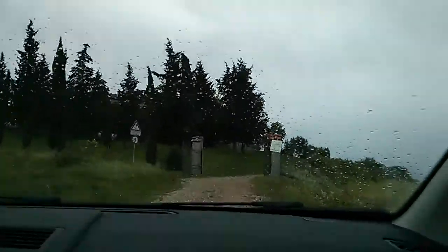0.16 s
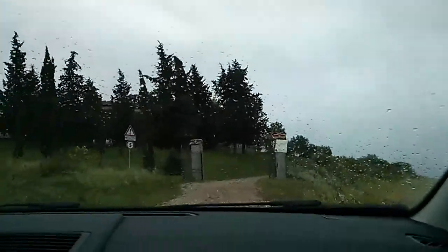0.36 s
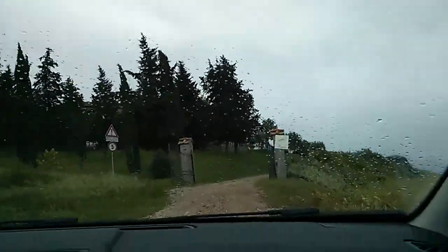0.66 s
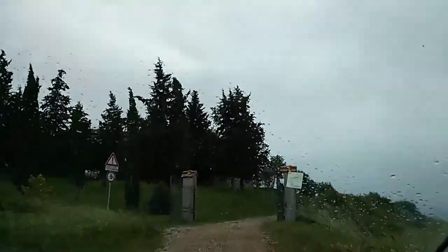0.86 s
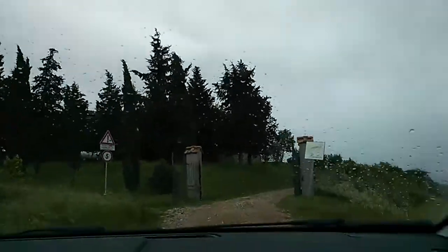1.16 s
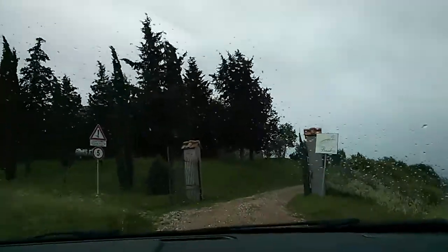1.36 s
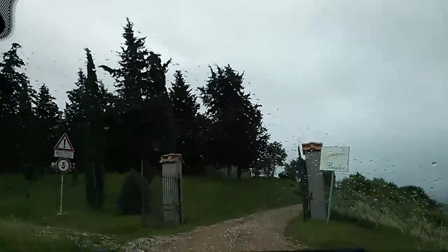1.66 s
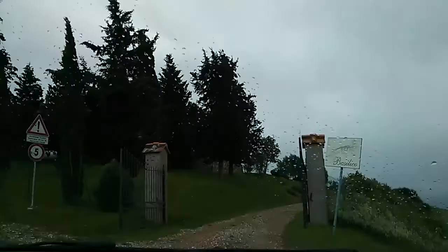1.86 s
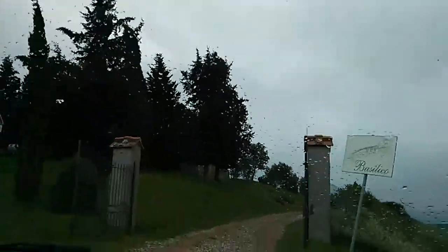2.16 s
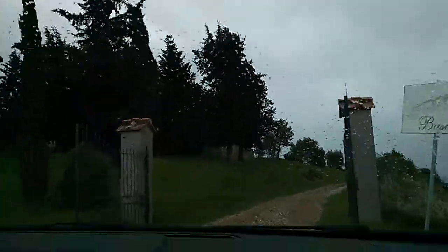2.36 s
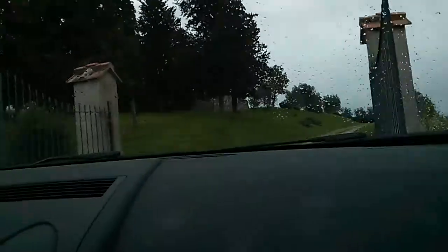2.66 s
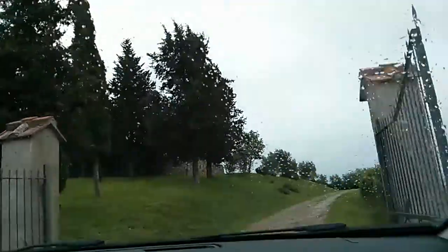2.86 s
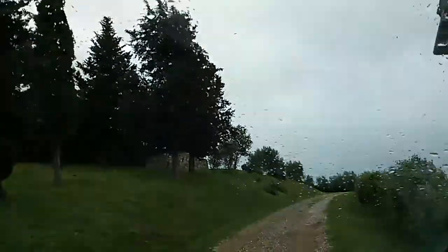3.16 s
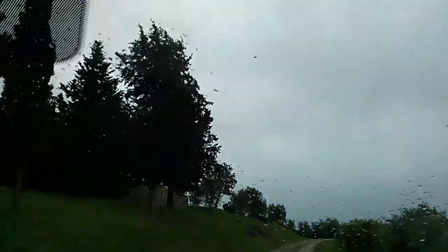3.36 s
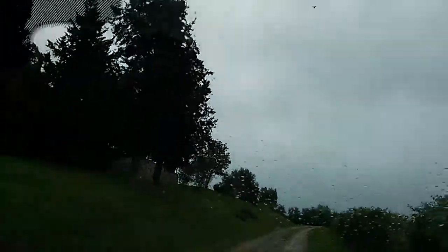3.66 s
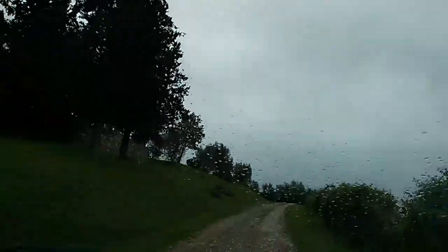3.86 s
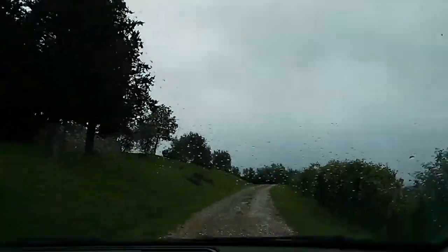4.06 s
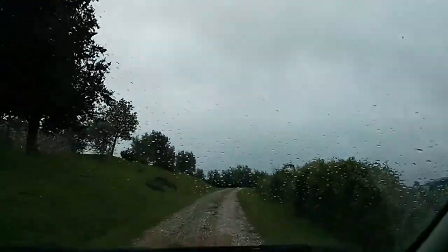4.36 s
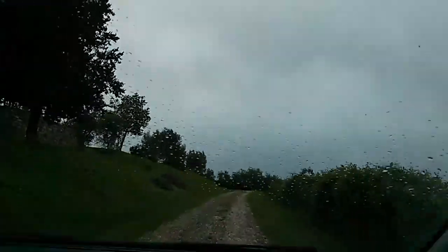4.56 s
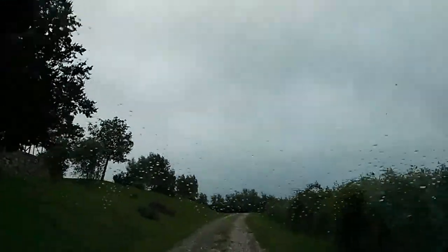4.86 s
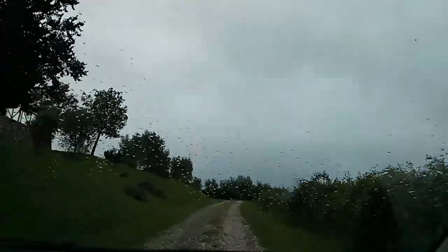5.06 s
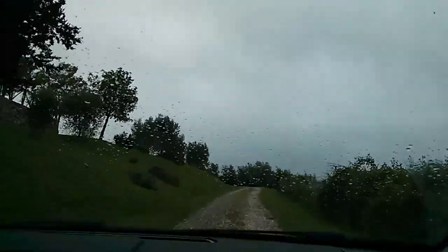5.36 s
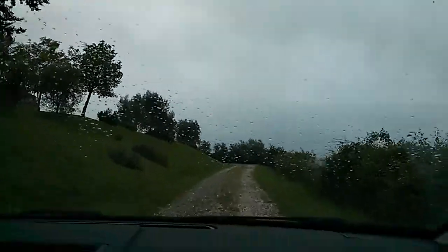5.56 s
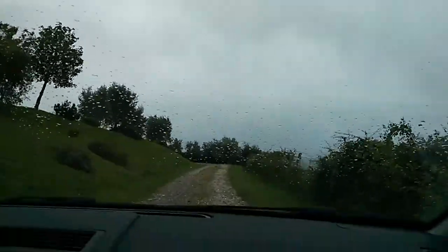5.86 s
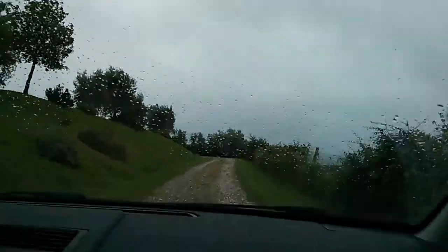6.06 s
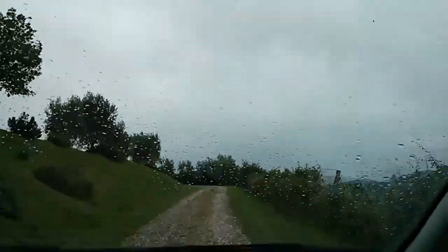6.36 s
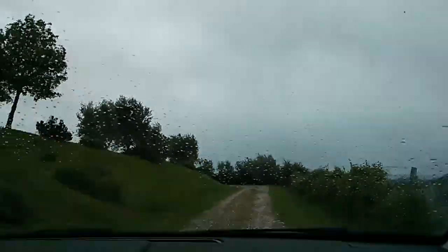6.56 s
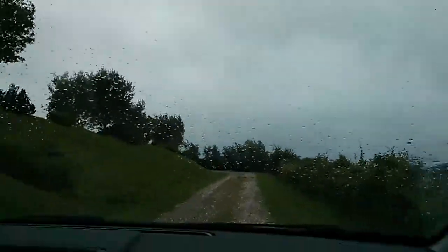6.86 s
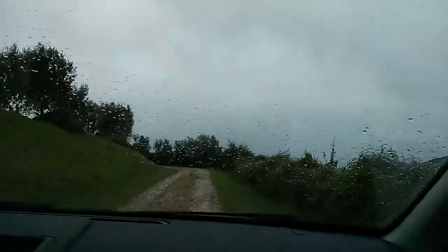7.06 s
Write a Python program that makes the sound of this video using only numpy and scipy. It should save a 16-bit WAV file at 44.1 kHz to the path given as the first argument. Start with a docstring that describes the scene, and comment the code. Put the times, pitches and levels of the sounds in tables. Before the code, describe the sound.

From the passenger seat of a car crawling up a rough track, the closed cabin holds a soft low engine hum and muffled tyre rumble. From 0 to 2.4 s it is subdued: gentle gravel crunch, fine grit, small trim knocks, light key clinks and low bumps near 1.3 and 1.6 s. Around 2.5 to 2.9 s firmer bumps come with a few stones below; plastic ticks and bright key jingles follow, strongest near 3.6 and 4.2 s. At about 4.7 s the ground turns violent: booming jolts, dull suspension clunks, rapid stone thuds and cracks, rattling fittings and a faint whine. The overloaded microphone blocks in short stutters, densest at 4.9-5.06 s and 6.2-6.4 s. A slight easing around 5.4 s precedes more knocks and heavy bumps near 6.4 s. Grit hisses louder near 6.6 s; leaves swish briefly along the door at 7.0-7.15 s, still moving at the end.

```python
"""Stones drum and gravel crunches under a car crawling along a rough track, heard from the passenger seat.
Filtered impacts and noise make the ground and a bush brushing the door; summed sines make engine and boom.
Decaying sines and chatter ring suspension, trim, a bunch of keys and stones on the underbody.
On the roughest stretch the small microphone in the cabin is overloaded and blocks in short stutters."""
import sys
import numpy as np
from scipy import signal
from scipy.fft import rfft, irfft, next_fast_len
from scipy.io import wavfile
from scipy.ndimage import uniform_filter1d

SR = 44100
rng = np.random.default_rng(int(sys.argv[2]) if len(sys.argv) > 2 else 0)


def generate_wav(sig):
    """Save sig (samples, or channels by samples) to the path in sys.argv[1] as 16-bit PCM at SR."""
    pcm = np.round(np.clip(np.atleast_2d(sig).T, -1, 1) * 32767).astype(np.int16)
    wavfile.write(sys.argv[1], SR, pcm)


N = 318843
TIME = np.arange(N) / SR  # seconds

# Levels are relative, ahead of the microphone; a source may add its own gain.
# Engine under the bonnet. Each row: time in seconds, firing rate in Hz before its wander, level in dB.
ENGINE = [(0, 53, -30), (1.2, 51.54, -37.5), (2.3, 50.08, -40.5), (4.1, 51.28, -34), (4.9, 54.46, -33),
          (5.6, 53.07, -28), (6.3, 52.28, -30), (7.23, 52.76, -22.5)]
# Its harmonics. Each row: multiple of the firing rate, level in dB.
ENGINE_ORDERS = [(1, -23), (2, -0.5), (3, -9.5), (4, -12), (5, -11)]
# Gearbox whine, faint. Each row: time in seconds, pitch in Hz, level in dB.
WHINE = [(0, 663, -54), (0.9, 657, -54.5), (1.3, 665, -53.5), (2.0, 660, -58), (3.2, 660, -58),
         (3.8, 682, -54.5), (4.4, 672, -56), (4.9, 740, -47), (5.3, 760, -42), (5.6, 765, -48),
         (6.7, 778, -42), (7.23, 783, -43)]

# A bush sweeps along the door. Each row: time in seconds, level in dB.
BRUSH = [(6.9, -94), (6.99, -39.5), (7.05, -35.5), (7.09, -31.5), (7.14, -39), (7.18, -69), (7.23, -67)]
# Colour of its leaves on the paintwork. Each row: frequency in Hz, level in dB.
BRUSH_COLOUR = [(700, -20), (1400, -1), (2200, -7), (3000, -16.5), (4000, -14), (6000, -6), (8500, 0.5),
                (11000, -5.5), (13500, -14), (16000, -30)]

# A small hard part ticks. Each row: start in seconds, level in dB.
TICKS = [(0.052, -41), (0.147, -41), (0.454, -42), (1.393, -46), (1.653, -59), (1.837, -49), (1.933, -46),
         (2.691, -29.5), (2.998, -29.5), (3.25, -41), (3.306, -27.5), (3.48, -41), (3.574, -30.5),
         (3.689, -40), (3.702, -39), (3.727, -42), (3.752, -37.5), (3.911, -47), (4.209, -34), (4.438, -41)]
# What it rings with. Each row: frequency in Hz, width in Hz, level in dB.
TICK_MODES = [(3100, 93, -11), (4140, 140, -6), (4560, 640, 7), (5200, 280, 1), (5830, 490, -1)]
# A looser fitting rattles. Each row: start in seconds, level in dB.
RATTLES = [(2.84, -42), (2.907, -37), (3.32, -33), (4.955, -22), (4.983, -14), (5.082, -21.5), (5.196, -25),
           (5.206, -20.5), (5.317, -37), (5.633, -43), (5.668, -43), (6.312, -32), (6.349, -44),
           (6.39, -45), (6.613, -29), (6.625, -30), (6.67, -28), (6.68, -48), (6.733, -30), (6.743, -41),
           (6.751, -20), (6.775, -51), (6.792, -32), (6.812, -31), (6.826, -56)]
# What it rings with. Each row: frequency in Hz, width in Hz, level in dB.
RATTLE_MODES = [(2670, 73, -16), (3300, 98, -3), (3670, 100, 9), (4160, 540, 7), (5100, 130, -20)]
# A hard plastic part clacks. Each row: start in seconds, level in dB.
CLACKS = [(1.025, -35)]
# What it rings with. Each row: frequency in Hz, width in Hz, level in dB.
CLACK_MODES = [(824, 60, 2), (1450, 90, -1), (1740, 100, 0), (1950, 170, 0), (2780, 300, -10.5),
               (4010, 200, -15), (5400, 260, -7), (6100, 270, -14), (7300, 200, -20)]

# Loose trim knocks. Each row: start in seconds, level in dB, centre in Hz.
KNOCKS = [(0.056, -33, 1540), (0.25, -28, 1130), (0.275, -43, 1710), (0.662, -42, 1060), (1.231, -39, 900),
          (1.3, -46, 1410), (1.377, -27, 760), (1.391, -45, 1900), (1.574, -35, 1050), (1.635, -33, 990),
          (1.837, -35, 1560), (2.26, -41, 1000), (2.611, -28.5, 1650), (2.8, -48, 990), (2.9, -29.5, 1900),
          (3.188, -37.5, 1470), (3.775, -34, 1600), (4.06, -36, 1050), (4.597, -25.5, 1550),
          (4.67, -34, 860), (4.776, -14, 1060), (5.575, -15, 1110), (5.836, -21.5, 1020),
          (6.047, -34, 2100), (6.183, -39, 1950), (6.393, -16.5, 1000), (6.466, -29, 915),
          (6.992, -31, 1140), (7.151, -21, 1500)]
# Ring time of a middling knock at 1 kHz; higher parts die away sooner by this power.
KNOCK_T60_S, KNOCK_DAMPING = 0.064, 0.58
# A harder knock presses the part home: its chatter halves every so many dB.
MIDDLING_KNOCK_DB, KNOCK_HALVING_DB = -17, 8.5

# Keys on their ring. Each row: frequency in Hz, level in dB, ring time (t60) in seconds.
KEY_MODES = [(7650, -2, .12), (8380, -4, .025), (8890, -1, .035), (9430, -2, .035), (9760, -2, .025),
             (10250, -4, .03), (10700, -4, .025), (11820, -6, .035), (12035, -2, .06), (12085, -3, .06),
             (12160, -4, .05), (12810, -6, .04), (13820, -3, .05), (14950, -5, .03), (15550, -5, .03)]
# Keys touch. Each row: start in seconds, ring level in dB, frequency rung hardest in Hz, scrape level in dB.
CLINKS = [(0.126, -48, 8700, -29), (0.471, -25, 7600, -13.5), (.539, -25, 12100, -24),
          (0.644, -43, 15500, -28.5), (1.886, -33, 8300, -17.5), (2.128, -20.5, 12040, -22),
          (2.155, -19, 13200, -20.5), (2.315, -43, 13800, -31), (2.488, -20.5, 10100, -25),
          (2.509, -33, 13800, -22), (2.653, -35, 7820, -22.5), (3, -27, 7650, -16.5),
          (3.036, -37, 13800, -23.5), (3.072, -32, 8400, -27), (3.089, -20, 9800, -25),
          (3.108, -14, 13300, -21), (3.336, -33, 9000, -20.5), (3.357, -35, 12100, -26),
          (3.412, -44, 12100, -32), (3.569, -17.5, 9700, -23), (3.617, -7.5, 12750, -14.5),
          (3.638, -13, 12000, -20.5), (3.76, -24.5, 9800, -29), (4.181, -12.5, 8900, -18.5),
          (4.275, -27, 13200, -26), (4.437, -29, 8250, -23.5), (4.495, -46, 8480, -23),
          (4.634, -26, 13100, -24.5), (4.681, -27, 14970, -24.5), (5.001, -19, 8460, -28),
          (5.026, -15, 11600, -28), (5.043, -9, 10300, -31), (5.27, -21, 8300, -30),
          (5.353, -40, 8200, -32), (5.482, -26.5, 9200, -21), (5.564, -22, 14600, -23),
          (5.87, -40, 8890, -21), (6.016, -27, 13900, -23.5), (6.084, -16, 9700, -21),
          (6.554, -17.5, 8160, -22), (6.641, -25, 9700, -24)]
# Light chance touches: their rate, and ring and scrape in dB above the capped grit level.
TOUCHES_PER_S, TOUCH_RING_DB, TOUCH_SCRAPE_DB = 4, 13, 21

# Suspension clunks over a big stone. Each row: start in seconds, level in dB, pitch in Hz.
CLUNKS = [(0.251, -26, 625), (0.585, -28, 342), (1.3, -29, 387), (1.548, -29, 391), (1.652, -23, 354),
          (1.715, -28, 350), (2.494, -26.5, 565), (2.616, -28, 760), (2.879, -37, 393), (3.283, -32, 355),
          (3.452, -27.5, 384), (4.775, -19.5, 824), (4.853, -16.5, 474), (5.056, -12, 475),
          (5.152, -15, 525), (5.212, -19, 420), (5.271, -12.5, 794), (5.297, -29, 335), (5.353, -17, 802),
          (5.491, -17.5, 598), (5.599, -18, 340), (5.665, -14.5, 321), (5.752, -14, 360),
          (5.787, -23.5, 500), (5.826, -17.5, 400), (5.838, -26.5, 710), (5.862, -26, 460),
          (6.004, -27, 686), (6.139, -20, 335), (6.252, -24.5, 436), (6.27, -21.5, 646), (6.379, -27, 420),
          (6.427, -19, 360), (6.467, -21, 387), (6.511, -25, 327), (6.682, -15, 413), (6.768, -17, 534),
          (6.99, -19, 760)]
# What it rings with. Each row: multiple of the pitch, level in dB.
CLUNK_MODES = [(.76, -4), (1, 4), (1.24, -4.5), (1.9, -17)]
CLUNK_T60_S, CLUNK_ATTACK_S, CLUNK_DB = 0.068, 0.0036, -0.5
REBOUND_S, REBOUND_DB = .016, -7.5  # mean delay of the second, softer blow

# A wheel drops into a rut. Each row: start in seconds, level in dB, boom in Hz.
BUMPS = [(0.05, -13.5, 165), (1.292, -14, 163), (1.591, -15.5, 208), (1.652, -16, 174), (1.883, -19, 128),
         (2.48, -11, 138), (2.552, -16, 185), (2.874, -8.5, 148), (3.969, -9.5, 179), (4.598, -14, 176),
         (4.648, -15, 177), (4.774, -7, 189), (4.852, -3.5, 186), (5.057, -1.5, 172), (5.168, 3, 125),
         (5.293, -1, 158), (5.501, -21, 169), (5.752, -7, 186), (6.428, 1.5, 119), (6.465, -0.5, 194),
         (6.873, -2, 112), (6.895, -7, 123)]
# The floor booms on washboard ground. Each row: start in seconds, length in seconds, pitch in Hz, level in dB.
WASHBOARD = [(0.01, 0.31, 168.4, -30), (0.451, 0.15, 113, -27), (0.912, 0.11, 105.3, -30),
             (1.296, 0.069, 166, -31), (4.031, 0.096, 160.1, -26), (4.585, 0.14, 176, -18.5),
             (4.761, 0.19, 190, -19.5), (5.474, 0.11, 179, -16.5), (6.365, 0.29, 185, -23.5),
             (6.704, 0.62, 181.5, -30.5)]

# Stones hit the underbody. Each row: start in seconds, thud level in dB, crack level in dB.
STRIKES = [(2.4914, -42, -58), (2.5294, -32.5, -44), (2.8784, -39, -57), (2.9058, -37, -51),
           (4.738, -23, -52), (4.774, -27, -38), (4.8214, -22, -33), (4.844, -19.5, -35),
           (4.8554, -19.5, -33), (4.8661, -27, -36), (4.8759, -13.5, -31), (4.8907, -18, -34),
           (4.91, -21, -35), (4.95, -20, -35), (4.968, -13.5, -30), (4.981, -19, -28), (5.001, -22, -31),
           (5.0267, -20.5, -31), (5.045, -20, -29), (5.0594, -37, -29), (5.0794, -36, -45),
           (5.104, -40, -33), (5.1574, -29.5, -35.5), (5.1752, -22, -33), (5.2048, -23, -33.5),
           (5.245, -27, -35), (5.2703, -20, -28), (5.3396, -29.5, -33), (5.3536, -24, -29.5),
           (5.49, -24, -53), (5.576, -29.5, -59), (5.6301, -22, -41), (5.6667, -25, -39), (5.695, -30, -48),
           (5.757, -34, -54), (5.834, -32, -55), (6.271, -36, -49), (6.3128, -28, -50),
           (6.3491, -26, -42.5), (6.394, -32, -52), (6.4383, -23.5, -53), (6.4504, -46, -49),
           (6.4668, -30, -50), (6.6117, -29.5, -34.5), (6.663, -26, -47), (6.7321, -38, -43),
           (6.7894, -30.5, -41), (6.9895, -23, -47)]
# Thud of the floor pan. Each row: frequency in Hz, width in Hz, level in dB.
THUD_MODES = [(425, 110, 9), (760, 230, 6), (996, 235, -5.5), (1206, 94, -3.5), (1604, 190, -7),
              (1900, 100, -1), (2230, 64, -4.5)]
# Crack of the stone itself. Each row: frequency in Hz, width in Hz, level in dB.
STONE_MODES = [(2970, 250, -6), (3960, 650, -1.6), (5400, 250, -0.5), (7150, 1900, 5.5)]

# Trend of the ground. Each row: time in seconds, body sway in dB, wheel rumble in dB, crunch in dB.
RIDE = [(0.0, -29, -27, -36), (0.14, -29.5, -30.5, -41.5), (0.7, -35.5, -34.5, -47),
        (1.53, -31.5, -31.5, -45.5), (2.15, -35.5, -34, -45.5), (2.64, -33.5, -33.5, -46.5),
        (3.58, -37.5, -33, -46.5), (4.09, -34, -33.5, -40.5), (4.61, -37.5, -29, -41),
        (4.83, -42, -20, -29), (5.07, -18, -24, -29), (5.48, -34, -21.5, -34), (6.04, -26.5, -25.5, -35.5),
        (6.32, -28, -18.5, -31.5), (6.99, -35, -22.5, -36), (7.23, -19, -24, -39)]
# Trend of the fine hiss of grit. Each row: time in seconds, level in dB.
GRIT_LEVEL = [(0.0, -55.5), (0.6, -61.5), (0.72, -58.5), (1.01, -70), (1.43, -61.5), (1.83, -60.5),
              (2.5, -57.5), (2.66, -50.5), (3.58, -56), (4.03, -59.5), (4.61, -50), (4.95, -56.5),
              (5.13, -57), (5.34, -64), (5.9, -46), (6.32, -57.5), (6.63, -37.5), (7.23, -49)]
SWAY_DB, RUMBLE_DB, CRUNCH_DB, GRIT_DB = 0.5, 1, -0.07, -5  # added to these trends
# The tyres cross a stony patch. Each row: start in seconds, length in seconds,
# rise of the rumble in dB, rise of the crunch in dB, rise of the grit in dB.
PATCHES = [(0.19, 0.087, 5.5, 3, 4), (0.396, 0.26, 4.5, -1, 5), (0.894, 0.2, 3.5, 1.5, 6.5),
           (1.25, 0.08, 6.5, 4.5, -3), (1.51, 0.23, 4, 0, 3.5), (1.826, 0.12, 4.5, 3, 12.5),
           (2.469, 0.13, 6, 4.5, 8.5), (2.862, 0.018, 12, 6.5, 3), (3.276, 0.063, 5, 2.5, 5.5),
           (3.947, 0.2, 6.5, -2.5, -1.5), (4.199, 0.089, 4.5, -4.5, 2), (4.367, 0.11, 4.5, -3.5, -6),
           (4.73, 0.12, 3.5, 1, 14), (4.953, 0.12, 6.5, 1.5, -3), (5.126, 0.21, 6.5, 2.5, 9),
           (5.49, 0.19, 3, 1.5, 8.5), (6.374, 0.18, 1.5, 0, 1), (6.603, 0.22, -0.5, 2.5, -11),
           (6.84, 0.03, 3.5, 3.5, -10), (6.956, 0.19, 1, 4.5, -1)]
PATCH_ATTACK_S, PATCH_RELEASE_S = 0.013, 0.054
SWAY_SHARE = 0.68  # of the rumble's rise in dB that the body follows

# Sway as it reaches the seat. Each row: frequency in Hz, level in dB per Hz.
SWAY = [(12, -30), (27, 4.5), (38, -2.5), (55, -5.5), (75, -3.5), (130, -70)]
# Wheel rumble as it reaches the seat. Each row: frequency in Hz, level in dB per Hz.
RUMBLE = [(35, -38), (60, -3), (80, -1), (105, 3.5), (135, -2), (178, -4.5), (220, -7), (255, -7.5),
          (310, -12), (400, -17.5), (510, -26), (620, -30), (1000, -72.5)]
# Coarse gravel as it reaches the seat. Each row: frequency in Hz, level in dB per Hz.
CRUNCH = [(250, -20), (450, 4), (570, 0), (760, 5.5), (920, -2), (1050, -2.5), (1400, -20), (2000, -17.5),
          (2450, -25), (3100, -47), (3900, -51), (5000, -45), (8000, -15.5), (15000, -37.5)]
# Fine grit as it reaches the seat. Each row: frequency in Hz, level in dB per Hz.
GRIT = [(2000, 1), (3200, -16), (4000, -9), (5000, -7), (6300, 1), (7700, 6), (9200, 3), (10300, 0),
        (11500, -15), (13500, -8.5), (16000, -13)]
# Stones cracking on the wheel arches. Each row: frequency in Hz, level in dB per Hz.
CRACK = [(1200, -9.5), (1650, 9.5), (2100, 11), (2550, 2), (2850, -17), (3200, -15), (3800, -5.5),
         (4400, -8.5), (5400, -3), (7000, -3), (10000, -32)]
# Dashboard and door panels. Each row: frequency in Hz, width in Hz, level in dB.
PANELS = [(250, 11, -15), (506, 22, -1), (645, 14, -6)]
PANEL_DB = -27  # panel ring against the crunch, before both are scaled
THROW_SPURT_DB = 4.6  # unevenness of the thrown stones, per unit of spurt
THROW_DB, THROW_GROWTH = 3.5, 1.6  # level of thrown stones, and its dB per dB of crunch

CABIN_T60_S, CABIN_ECHO_DB = 0.077, 2.5  # cabin ring time, and its echoes against the direct sound

# The microphone is shaken past its limit. Each row: start in seconds, end in seconds,
# blocked share of each shake (0 to 1).
OVERLOAD = [(4.731, 4.739, .42), (4.863, 4.867, .22), (4.88, 4.909, .5), (4.918, 4.95, .62),
            (4.957, 4.98, .52), (4.986, 5.0, .74), (5.009, 5.026, .9), (5.033, 5.057, .52),
            (5.184, 5.193, .42), (5.263, 5.271, .36), (5.735, 5.742, .3), (5.899, 5.908, .42),
            (5.961, 5.986, .42), (6.034, 6.047, .64), (6.205, 6.232, .52), (6.24, 6.29, .56),
            (6.297, 6.326, .44), (6.336, 6.37, .62), (6.439, 6.467, .55), (6.493, 6.506, .64),
            (6.568, 6.587, .96), (6.594, 6.606, .55), (6.635, 6.64, .22), (6.648, 6.658, .45),
            (6.725, 6.732, .34), (6.752, 6.765, .64), (6.965, 6.99, .42)]
SHAKE_HZ, TOP_HZ = 53, 15700  # rate of the stutters; upper edge of the microphone's band


def undb(db):
    """Decibels to gain."""
    return 10 ** (np.asarray(db) / 20)


def unit(x):
    """Scale to rms 1."""
    return x / np.sqrt(np.mean(x ** 2))


def curves(table):
    """The columns of a table, joined by straight lines in time."""
    s, *columns = np.transpose(table)
    return [np.interp(TIME, s, column) for column in columns]


def colour(x, points):
    """Causal minimum-phase filter with the given (Hz, dB) shape; rms 1."""
    hz, db = np.transpose(points)
    size = next_fast_len(N + SR // 2, True) // 2 * 2
    bins = np.maximum(np.arange(size // 2 + 1) * SR / size, 1)
    gain = undb(np.interp(np.log(bins), np.log(hz), db))
    # folding the cepstrum forward in time makes the filter causal
    cepstrum = irfft(np.log(gain))
    cepstrum[1:size // 2] *= 2
    cepstrum[size // 2 + 1:] = 0
    response = np.exp(rfft(cepstrum))
    return unit(irfft(rfft(x, size) * response)[:N])


def resonance(x, hz, width):
    """One resonance, gain 1 at its centre."""
    return signal.lfilter(*signal.iirpeak(hz, hz / width, fs=SR), x)


def walk(rate):
    """Smooth random wander with rms 1, taking a new direction this many times a second."""
    k = int(SR / rate)
    steps = np.repeat(rng.standard_normal(N // k + 1), k)
    return unit(uniform_filter1d(steps, k)[:N])


def stones(rate, spread_db):
    """Random tiny impacts (per second), many weak and a few strong; rms 1."""
    chance, size, sign = rng.random(N), rng.exponential(size=N), rng.standard_normal(N)
    strength = undb(spread_db * np.minimum(size, 5))
    return unit((chance < rate / SR) * np.sign(sign) * strength)


def fade(t, t60):
    """Exponential decay by 60 dB in t60 seconds."""
    return np.exp(-np.log(1000) * t / np.maximum(t60, 1 / SR))


def add(track, s, sound):
    """Mix a sound in at a time in seconds."""
    i = max(int(s * SR), 0)
    track[i:i + len(sound)] += sound[:N - i]


def wavering(hz, rate, steady):
    """A narrow resonance driven partly evenly and partly by chance; rms 1."""
    phase = 2 * np.pi * np.cumsum(np.broadcast_to(hz, N)) / SR
    in_phase = (steady + walk(rate)) * np.sin(phase)
    return unit(in_phase + walk(rate) * np.cos(phase))


def swell(start, length):
    """Rise, hold and release from 0 to 1 while the tyres cross a stretch of ground."""
    hold = max(length - PATCH_ATTACK_S, 0)
    corners = np.cumsum([0, PATCH_ATTACK_S, hold, PATCH_RELEASE_S])
    return np.interp(TIME - start, corners, [0, 1, 1, 0])


def echoes(x, count=6):
    """Glass and dashboard smear each click briefly, differently for each place it comes from; rms 1."""
    t, out = TIME[:SR // 16], x
    place = rng.integers(count, size=N)
    for k in range(count):
        response = rng.standard_normal(len(t)) * fade(t, CABIN_T60_S)
        response = response / np.linalg.norm(response)
        out = out + undb(CABIN_ECHO_DB) * signal.oaconvolve(x * (place == k), response)[:N]
    return unit(out)


def struck(hits, modes, t60, gain_db, vary_db):
    """Each hit (s, dB) is a chatter of contacts ringing one part, with its own length and balance of modes."""
    out, t = np.zeros(N), TIME[:SR // 12]
    for s, db in hits:
        shape = fade(t, t60 * 2 ** (rng.random() - .5))
        chatter = rng.standard_normal(len(t)) * shape
        ring = 0
        for hz, width, mode_db in modes:
            mode = resonance(resonance(chatter, hz, width), hz, 3 * width)
            ring = ring + undb(mode_db + vary_db * rng.standard_normal()) * mode
        add(out, s, undb(db + gain_db) * unit(ring) * np.sqrt(np.mean(shape ** 2)))
    return out


def engine(rough_db=7.5, wander=0.01206):
    """Low firing orders of a four-cylinder engine under light, uneven load."""
    hz, db = curves(ENGINE)
    phase = 2 * np.pi * np.cumsum(hz * (1 + wander * walk(8.2))) / SR
    hum = 0
    for order, order_db in ENGINE_ORDERS:
        level = undb(order_db + rough_db * walk(14))
        hum = hum + level * np.sin(round(order) * phase + 2 * np.pi * rng.random())
    return unit(hum) * undb(db)


def gearbox():
    """A faint, unsteady whine: one narrow resonance following the pitch table."""
    hz, db = curves(WHINE)
    return wavering(hz, rate=40, steady=.8) * undb(db)


def brush():
    """Countless leaves flick past the paintwork: dense tiny impacts, smeared by the cabin."""
    db, = curves(BRUSH)
    return colour(echoes(stones(rate=4300, spread_db=6.0)), BRUSH_COLOUR) * undb(db)


def fittings():
    """Small hard parts in the cabin tick, rattle and clack, each chatter ringing its own modes."""
    ticks = struck(TICKS, TICK_MODES, t60=0.05, gain_db=-8.5, vary_db=7)
    rattles = struck(RATTLES, RATTLE_MODES, t60=0.045, gain_db=-11.0, vary_db=4.5)
    clacks = struck(CLACKS, CLACK_MODES, t60=0.095, gain_db=-0.5, vary_db=1)
    return ticks + rattles + clacks


def trim(width=0.3, gain_db=-11.5):
    """Plastic parts chatter briefly in a broad resonance; gentle knocks rattle on longer."""
    out, t = np.zeros(N), TIME[:SR // 5]
    for s, db, hz in KNOCKS:
        t60 = KNOCK_T60_S * (hz / 1000) ** -KNOCK_DAMPING
        t60 = t60 * 2 ** ((MIDDLING_KNOCK_DB - db) / KNOCK_HALVING_DB)
        shape = fade(t, t60)
        chatter = rng.standard_normal(len(t)) * shape
        knock = resonance(resonance(chatter, hz, hz * width), hz, 2 * hz * width)
        add(out, s, undb(db + gain_db) * unit(knock) * np.sqrt(np.mean(shape ** 2)))
    return out


def touches(grit_db, most_db=-55, spread_db=6):
    """The keys also brush each other lightly by chance, following the grit level up to a cap; rows as in CLINKS."""
    rows = []
    for when, size, mode in rng.random((int(TOUCHES_PER_S * N / SR), 3)):
        db = min(grit_db[int(when * N)], most_db) + spread_db * (size - .5)
        strongest_hz = KEY_MODES[int(mode * len(KEY_MODES))][0]
        rows.append((when * N / SR, db + TOUCH_RING_DB, strongest_hz, db + TOUCH_SCRAPE_DB))
    return rows


def keys(contacts, focus=0.05, others_db=-20, bounce_s=0.0044, bounce_db=-5, scrape_t60=0.035,
         tail_db=-23, tail_t60=0.81, ring_db=-5, scrape_db=-8, detune=0.0004, patter_db=1.5,
         ring_rise_s=0.011, scrape_rise_s=0.014):
    """Keys scrape together and ring; the place of contact decides which modes speak."""
    rings, scrapes, t = np.zeros(N), np.zeros(N), TIME[:2 * SR // 3]
    hz, mode_db, t60 = np.transpose(KEY_MODES)[:, :, None]
    ring_t = TIME[:SR // 7]
    decays = fade(ring_t, t60)
    for s, db, strongest_hz, contact_db in contacts:
        # the keys hang a little differently at every touch
        hung_hz = hz * (1 + detune * rng.standard_normal(hz.shape))
        modes = np.sin(2 * np.pi * hung_hz * ring_t) * decays
        nearness = np.exp(-(np.log(hz / strongest_hz) / focus) ** 2)
        weight = undb(mode_db) * (undb(others_db) + nearness)
        ring = (weight * modes).sum(axis=0) / np.linalg.norm(weight)
        ring = ring * (1 - fade(ring_t, ring_rise_s))
        # a touch bounces twice, weaker each time
        for k, late in enumerate(rng.random(size=3)):
            bounce = undb(db + ring_db + k * bounce_db) * ring
            add(rings, s + k * bounce_s * (.5 + .5 * late), bounce)
        # the cabin holds each scrape for a moment
        shape = fade(t, scrape_t60) + undb(tail_db) * fade(t, tail_t60)
        shape = shape * (1 - fade(t, scrape_rise_s))
        add(scrapes, s, undb(contact_db + scrape_db) * rng.standard_normal(len(t)) * shape)
    # colour of scraped metal: (Hz, dB)
    metal = [(3000, -37), (5500, -20.5), (7200, -2.5), (9000, 2.5), (11000, -5.0),
             (13000, -8.5), (16000, -7), (19000, -59)]
    return rings + np.std(scrapes) * colour(scrapes, metal) * undb(patter_db * walk(200))


def suspension(detune=.03):
    """Each clunk is a blow and a rebound ringing a few close, dull modes, a little differently every time."""
    out, t = np.zeros(N), TIME[:SR // 6]
    multiple, mode_db = np.transpose(CLUNK_MODES)[:, :, None]
    weight = undb(mode_db) / np.linalg.norm(undb(mode_db))
    shape = fade(t, CLUNK_T60_S) * (1 - fade(t, CLUNK_ATTACK_S))
    for s, db, hz in CLUNKS:
        for k in range(2):
            mode_hz = hz * multiple * (1 + detune * rng.standard_normal(multiple.shape))
            ring = (weight * np.sin(2 * np.pi * mode_hz * t)).sum(axis=0)
            when = s + k * REBOUND_S * (.5 + rng.random())
            add(out, when, undb(db + CLUNK_DB + k * REBOUND_DB) * shape * ring)
    return out


def bumps(t60=0.05, overtone=1.83, overtone_db=-7):
    """Each rut booms two cabin resonances."""
    out, t = np.zeros(N), TIME[:SR // 4]
    for s, db, hz in BUMPS:
        boom = np.sin(2 * np.pi * hz * t) + undb(overtone_db) * np.sin(2 * np.pi * overtone * hz * t)
        add(out, s, -undb(db) * boom * fade(t, t60) * (1 - fade(t, 0.022)))
    return out


def washboard(ridge_rate=55, steady=.9):
    """Each run of uneven ridges keeps the floor booming for as long as it lasts."""
    out = np.zeros(N)
    for s, length, hz, db in WASHBOARD:
        out += wavering(hz, ridge_rate, steady) * undb(db) * swell(s, length)
    return out


def underbody():
    """Big stones hit the car from below: each is a thud of the floor pan and a sharp crack."""
    s, thud_db, crack_db = np.transpose(STRIKES)
    thuds = struck(zip(s, thud_db), THUD_MODES, t60=0.06, gain_db=-2, vary_db=3)
    cracks = struck(zip(s, crack_db), STONE_MODES, t60=0.071, gain_db=0.0, vary_db=2.5)
    return thuds + cracks


def ride():
    """Levels of sway, rumble, crunch and grit in dB: the slow trend, shifted by each stony patch."""
    sway_db, rumble_db, crunch_db = curves(RIDE)
    grit_db, = curves(GRIT_LEVEL)
    rises = [np.outer(rises_db, swell(s, length)) for s, length, *rises_db in PATCHES]
    jolt_db, grind_db, spray_db = sum(rises)
    return (sway_db + SWAY_DB + SWAY_SHARE * jolt_db, rumble_db + RUMBLE_DB + jolt_db,
            crunch_db + CRUNCH_DB + grind_db, grit_db + GRIT_DB + spray_db)


def wheels(sway_db, rumble_db, hardening=0.32, deep_hz=130):
    """The body sways on its springs while stones drum through the tyres into the cabin."""
    travel_db = np.minimum(sway_db, -25)  # the springs limit the sway
    sway = colour(rng.standard_normal(N), SWAY) * undb(travel_db + 0.5)
    blows = stones(rate=400, spread_db=1.6) * undb(1.44 * walk(22))
    drumming = colour(blows, RUMBLE)
    lowpass = signal.butter(2, deep_hz, fs=SR, output="sos")
    deep = signal.sosfiltfilt(lowpass, drumming)
    # harder blows are shorter, so the weight moves up out of the deep bass
    tilt_db = hardening * (uniform_filter1d(rumble_db, SR // 3) + 21.0)
    tilted = deep * undb(-tilt_db) + (drumming - deep) * undb(.5 * tilt_db)
    return sway + tilted * undb(rumble_db - 0.5)


def pebbles(level_db, rate, low_hz, high_hz, cycles, spread_db):
    """Single stones click at their own pitch, each with a second mode at 0.99 to 1.473 times it."""
    out, t = np.zeros(N), TIME[:SR // 20]
    for when, pitch, length, size, upper in rng.random((int(rate * N / SR), 5)):
        hz = low_hz * (high_hz / low_hz) ** pitch
        second_hz = hz * (0.99 + 0.483 * upper)
        click = np.sin(2 * np.pi * hz * t) + 0.64 * np.sin(2 * np.pi * second_hz * t)
        shape = fade(t, cycles * (.5 + length) / hz) * (1 - fade(t, 6 / hz))
        db = level_db[int(when * N)] + spread_db * min(-np.log(1 - size), 3)
        add(out, when * N / SR, undb(db) * click * shape)
    return out


def gravel(crunch_db, grit_db):
    """Stones grind under the tread in quick spurts; the coarse ones ring the panels, the fine ones hiss."""
    spurts = walk(55)
    coarse = stones(rate=600, spread_db=3.0) * undb(2.8 * spurts)
    panels = unit(sum(undb(db) * resonance(coarse, hz, width) for hz, width, db in PANELS))
    crunch = (colour(coarse, CRUNCH) + undb(PANEL_DB) * panels) * undb(crunch_db - 4.5)

    fine = stones(rate=1200, spread_db=5.0) + .6 * rng.standard_normal(N)
    fine = fine * undb(1.6 * spurts + 2.0 * walk(25))
    hiss = colour(echoes(fine), GRIT) * undb(grit_db + 5.5) * undb(0.78 * walk(90))

    # single stones in three ranges of pitch
    thudding = pebbles(crunch_db + 1.0, rate=45, low_hz=287.5, high_hz=735.5, cycles=42, spread_db=2.0)
    knocking = pebbles(crunch_db - 8, rate=60, low_hz=855.0, high_hz=1750, cycles=54, spread_db=2.6)
    ticking = pebbles(grit_db - 4, rate=45, low_hz=3700, high_hz=8000, cycles=70, spread_db=3.5)

    # stones thrown against the wheel arches grow faster than the crunch
    spray = stones(rate=220, spread_db=2.5) * undb(THROW_SPURT_DB * np.minimum(spurts, 2))
    thrown = colour(echoes(spray), CRACK) * undb(THROW_GROWTH * crunch_db + THROW_DB)
    return crunch + hiss + thudding + knocking + ticking + thrown


def scene():
    """Everything as it meets in the cabin, at the passenger seat."""
    sway_db, rumble_db, crunch_db, grit_db = ride()
    drive = engine() + gearbox()
    loose_parts = fittings() + trim() + keys(CLINKS + touches(grit_db))
    jolts = suspension() + bumps() + washboard() + underbody()
    ground = wheels(sway_db, rumble_db) + gravel(crunch_db, grit_db)
    cabin = drive + brush() + loose_parts + jolts + ground
    return cabin[None]


def record(dry, relax_s=0.006, edge_s=0.0002, leak_db=-23):
    """While the microphone is blocked almost nothing passes and its output sags to rest; the top is cut."""
    blocked = np.zeros(N)
    for start, end, share in OVERLOAD:
        within = (TIME >= start) & (TIME < end)
        blocked[within & ((TIME - start) * SHAKE_HZ % 1 < share)] = 1
    soft_edged = uniform_filter1d(blocked, max(int(edge_s * SR), 1))
    passing = 1 - (1 - undb(leak_db)) * soft_edged
    # gate the input's changes, then let a leaky sum rebuild the output
    sag = [1, -np.exp(-1 / (relax_s * SR))]
    changes = signal.lfilter(sag, [1], dry)
    heard = signal.lfilter([1], sag, passing * changes)
    rounded = np.tanh(1.262 * heard) / 1.318  # soft limiting of loud peaks
    top_cut = signal.ellip(10, .2, 80, TOP_HZ, fs=SR, output="sos")
    return signal.sosfilt(top_cut, rounded)


dry = scene()
out = record(dry)
generate_wav(out)
```